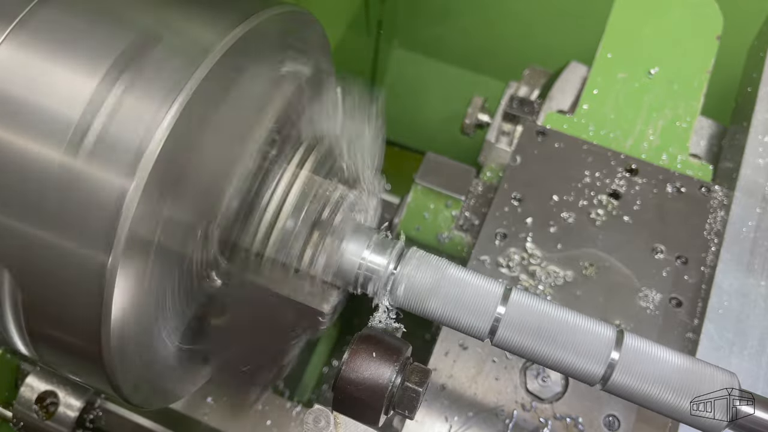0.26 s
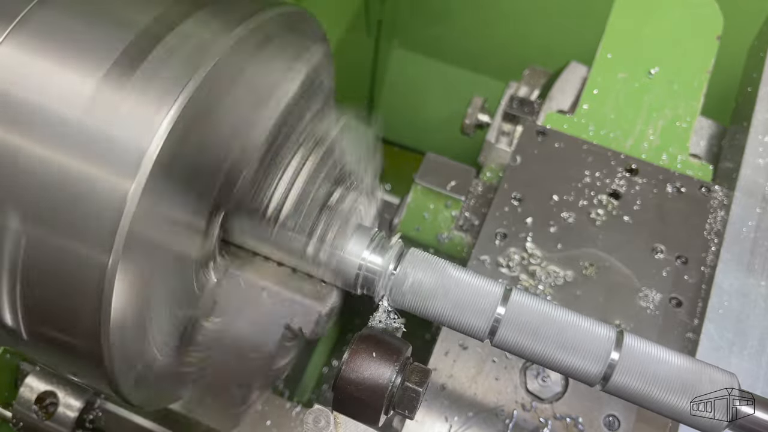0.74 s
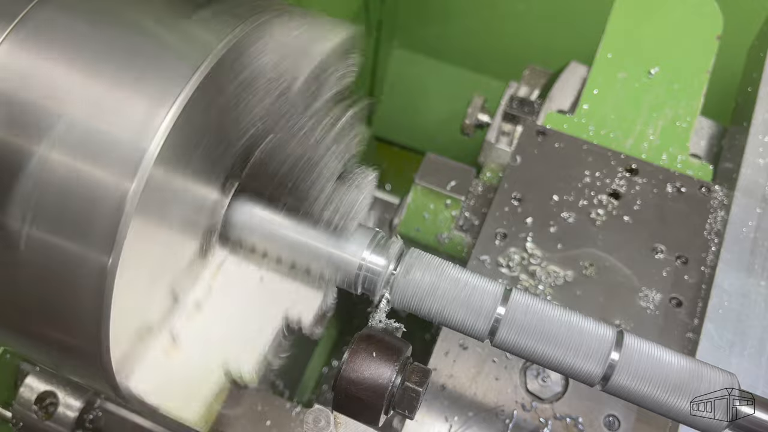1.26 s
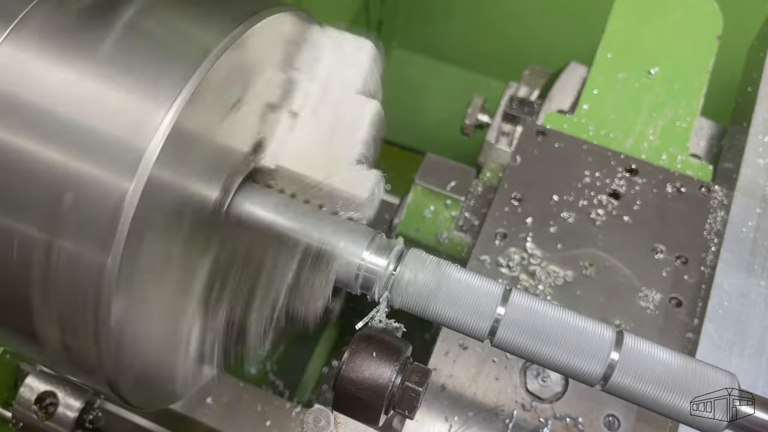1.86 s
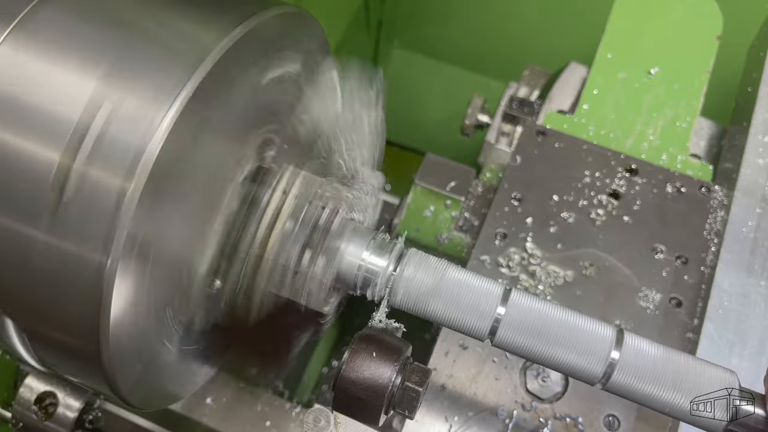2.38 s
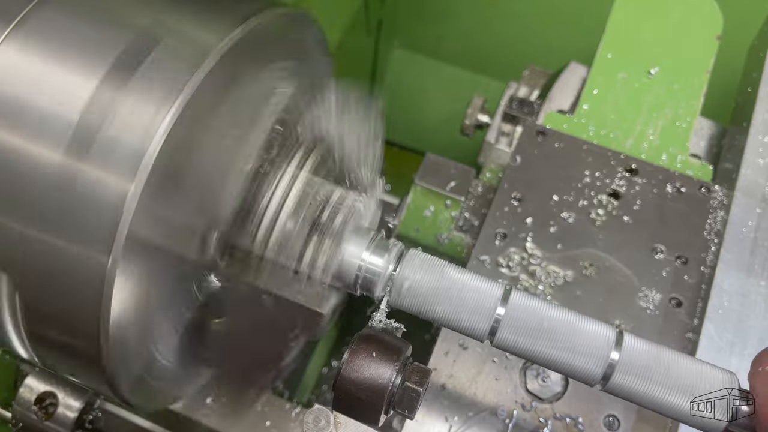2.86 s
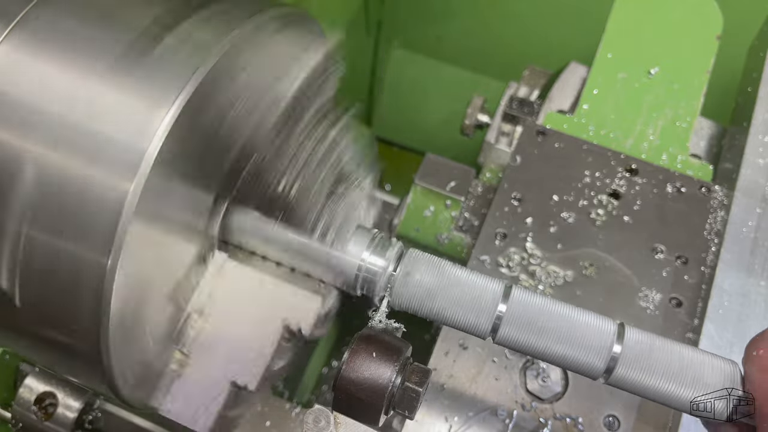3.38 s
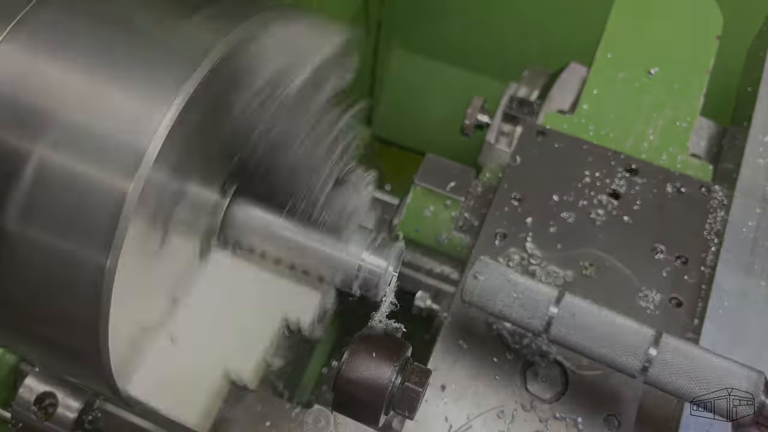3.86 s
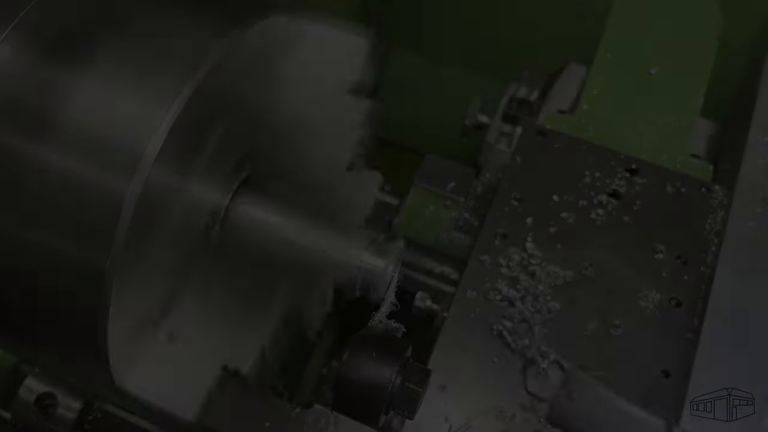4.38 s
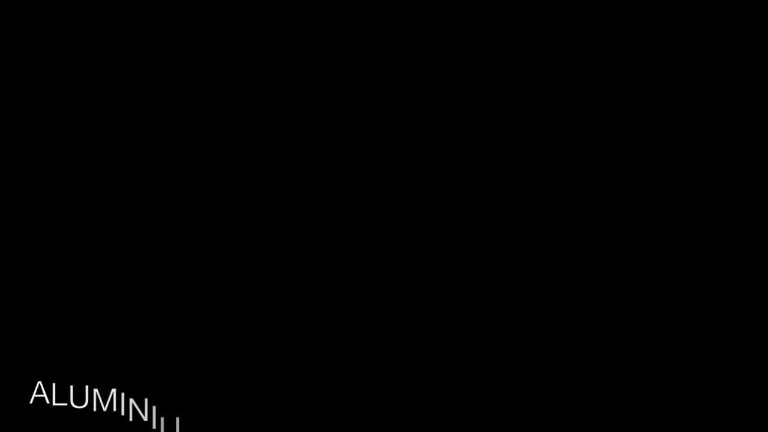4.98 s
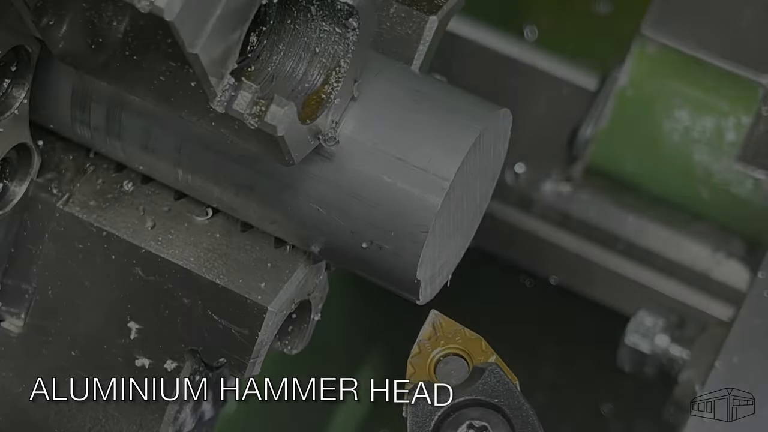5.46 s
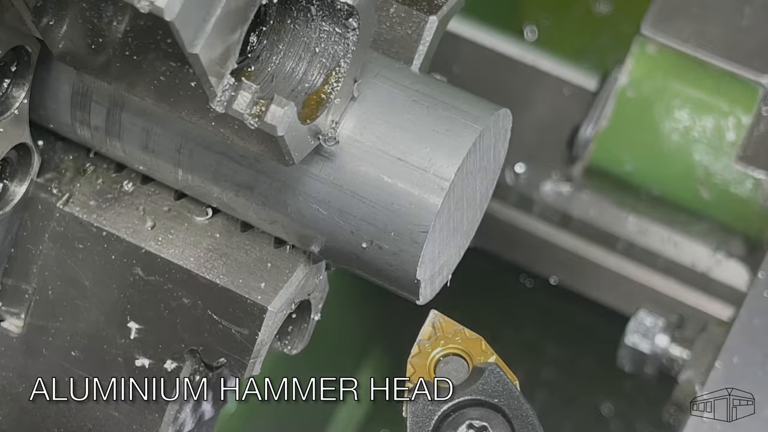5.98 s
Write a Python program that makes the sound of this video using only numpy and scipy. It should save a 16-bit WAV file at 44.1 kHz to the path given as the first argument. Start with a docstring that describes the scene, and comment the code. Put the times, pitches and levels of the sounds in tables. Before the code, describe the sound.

In a workshop, close to a stereo microphone, a geared lathe runs with a steady, buzzing mid-pitched whine and broad casing roar. A parting blade hisses brightly and unevenly, weakens, sings in narrow high bands, then stops past the middle. Low handwheel rumbles come in bursts and small chips tick. Late on, soft thumps mark the cut piece being set down as everything fades.

```python
"""A geared metal lathe runs in a workshop while a hand-fed blade parts off a bar, close to a two-port microphone.
Two gear pairs whine in tooth-mesh tones that throb with their shafts; noise through panel resonances is the casing roar.
The blade hisses in scraped noise and sings in narrow noise bands, weakening unevenly towards the centre of the bar.
The handwheel rumbles in bed, tray and guard, chips tick on the slide, and the cut-off piece is set down in soft thumps.
A low drone of the room swells in late; at the end the whole sound fades down."""
import sys
import numpy as np
from scipy.fft import rfft, irfft, next_fast_len
from scipy.io import wavfile
from scipy.ndimage import map_coordinates

SR = 44100
rng = np.random.default_rng(int(sys.argv[2]) if len(sys.argv) > 2 else 0)


def wrap_up_sound(samples):
    """Save the sound to the file named by the first command line argument, as 16-bit audio."""
    columns = np.atleast_2d(samples).T
    # keep every value between -1 and 1, then stretch to whole-number steps
    tamed = np.clip(columns, -1, 1)
    steps = np.round(tamed * 32767).astype(np.int16)
    wavfile.write(sys.argv[1], SR, steps)


N = 274731
TIME = np.arange(N) / SR  # s

DRIVE_HZ = 423.56  # tooth mesh of the motor gear
LAYSHAFT_HZ, IDLER_HZ, SPINDLE_HZ = 43.08, DRIVE_HZ / 45, 7.2  # shaft turns
GEARED_SPINDLE_HZ = LAYSHAFT_HZ / 6  # spindle turns reckoned through the gears
THROB_S = 0.01473  # first high spot of the layshaft gear

# Force of the cut, heard as hiss; the last row ends the cut: (t/s, hiss level/dB)
CUT = [(0.0, -40), (0.5, -43.5), (1.45, -41), (1.7, -46.5), (2.05, -48), (2.64, -52.5), (2.72, -44.5),
       (2.9, -47), (3.08, -56), (3.29, -49), (3.7, -60)]
CUT_END_S = CUT[-1][0]
# Resonances of the lathe bed: (f/Hz, width/Hz, relative level/dB)
BED = [(111, 70, -11.5), (166, 45, 6.5), (210, 50, 4)]


def amp(db):
    """Decibels to a linear factor."""
    return 10 ** (np.asarray(db) / 20)


def unit(x):
    """x scaled to an rms of 1 over all its samples and channels."""
    return x / np.sqrt(np.mean(x ** 2) + 1e-20)


def along(points, hz):
    """Value at each frequency, from (f/Hz, value) points joined on a log axis."""
    f, v = np.transpose(points)
    return np.interp(np.log(hz + 1), np.log(f + 1), v)


def curve(points):
    """One value per sample, from (t/s, value) points joined by straight lines."""
    return np.interp(TIME, *np.transpose(points))


def wobble(rate):
    """A smooth random curve with rate knots a second."""
    knots = rng.standard_normal(int(N * rate / SR) + 4)
    return map_coordinates(knots, [np.arange(N) * rate / SR])


def filtered(x, response):
    """x filtered by a complex response of frequency."""
    m = next_fast_len(N + 8192)
    hz = np.fft.rfftfreq(m, 1 / SR)
    return irfft(rfft(x, m) * response(hz), m)[..., :N]


def ports(pair, gain):
    """Two unrelated signals become left and right with the likeness, balance and lead of the two ports."""
    # Correlation between the ports: (f/Hz, likeness 0-1)
    alike = [(60, 1), (280, 0.86), (600, 0.6), (900, 0.54), (1250, 0.34), (1900, 0.36), (2300, 0.28),
             (3900, 0.84), (5000, 0.55), (6800, 0.62), (8300, 1), (11000, 0.99), (13000, 0.87)]
    # Level balance of the ports: (f/Hz, left over right/dB)
    lean = [(60, -1.5), (150, -1.5), (500, 1.5), (1200, 0), (1500, 1), (1730, 5.5), (1900, 2), (2600, 4),
            (4600, 4.5), (6000, 3), (8200, 0)]
    # Phase between the ports: (f/Hz, left lead/rad)
    lead = [(100, 0), (2600, 0), (3300, .9), (4600, .2), (5000, .8), (7400, .8), (8700, 0), (9150, -1.2),
            (9800, -2.6), (10000, -np.pi), (10420, -np.pi), (11200, -5), (11800, -2 * np.pi)]

    def mix(hz):
        # the angle between common and opposed parts sets the likeness
        turn = np.arccos(np.clip(along(alike, hz), -1, 1)) / 2
        return gain(hz) * np.array([np.cos(turn), np.sin(turn)])

    def place(hz):
        half = amp(along(lean, hz) / 2) * np.exp(.5j * along(lead, hz))
        return np.array([half, 1 / half])

    mid, side = filtered(pair, mix)
    return filtered(np.array([mid + side, mid - side]), place)


def noise():
    """Two unrelated channels of white noise."""
    return rng.standard_normal((2, N))


def turning(hz, start=0):
    """Cosine of a shaft's angle, highest at the start time in s."""
    return np.cos(2 * np.pi * hz * (TIME - start))


def tone(angle, db, pan_db, lead, waver_db):
    """A tone whose strength wavers; the angle is that of the sum of both ports, complex to swing level too."""
    pair = np.array([[amp(pan_db) * np.exp(1j * lead)], [1]])
    pair = pair / np.linalg.norm(pair) * np.exp(-1j * np.angle(pair.sum()))
    level = 2 * amp(db + waver_db * wobble(7))
    return level * np.real(pair * np.exp(1j * angle))


def repeating(hz):
    """Noise that comes round again hz times a second: the flaws of the same teeth."""
    once = rng.standard_normal((2, 8192))
    where = np.arange(N) * hz / SR % 1 * (SR / hz)  # sample within the turn
    return unit(np.array([map_coordinates(v, [where], order=1) for v in once]))


def ringing(modes):
    """Response of (f/Hz, width/Hz, level/dB) resonances, summed with alternating signs."""
    def response(f):
        return sum((-1) ** k * amp(db) * 1j * f * w / (c * c - f * f + 1j * f * w)
                   for k, (c, w, db) in enumerate(modes))
    return response


def song(hz, width_hz):
    """A narrow, fluttering band of noise round a fixed or moving frequency."""
    slow = filtered(rng.standard_normal((4, N)), lambda f: 1 / (1 + (f / width_hz) ** 2))
    angle = 2 * np.pi * np.cumsum(hz + np.zeros(N)) / SR
    band = slow[:2] * np.cos(angle) + slow[2:] * np.sin(angle)
    return unit(ports(amp(1.4 * wobble(24.03)) * band, np.ones_like))


def layshaft_whine():
    """Mesh multiples of the layshaft gear; their shaft sidebands beat, so the whine throbs once a turn."""
    # Gear tones: (mesh multiple, layshaft multiple, rms level/dB before load, left over right/dB, left lead/rad)
    gear_tones = [(1, 0, -43, -1, 0.1), (2, 0, -41, 14, 2.3), (2, 1, -50, 0, 0.1), (3, -1, -48, -6, -0.7),
                  (3, 0, -39, 3, -1.9), (3, 1, -39, 2, -0.1), (4, -1, -42, -1, -0.0), (4, 0, -38, -2, 0.5),
                  (4, 1, -43, 7, -0.6), (5, -1, -44, 10, -0.5), (5, 0, -39.5, 7, -2.8), (5, 1, -48, 9, 1.4),
                  (6, -1, -55, 21, -1.4), (7, -1, -61, 7, 0.8), (7, 0, -59, 7, -0.4), (8, 0, -58, 11, 0.1)]
    # Strength of the whine before the scalings below: (t/s, load/dB)
    load = [(0, -2), (.25, 0.5), (.6, .5), (1.3, -1), (1.55, 0.5), (1.85, 1), (2.3, 0), (3.0, 0), (3.7, -1),
            (4.3, 1), (4.8, -0.5), (5.5, -0.5), (6.2, 1)]
    # Third layshaft multiple: (t/s, rms level/dB before waver)
    low_tone = [(0, -52), (.45, -52), (.58, -42), (.9, -45.5), (1.3, -46), (1.65, -55), (1.85, -44),
                (2.2, -49), (2.6, -68), (2.9, -45.5), (3.7, -55.5), (6.2, -49)]
    mesh_hz, tooth_s, casing_lag = 348.27, .00018, .8  # Hz; first tooth contact, s; lag of the casing, rad
    smear = .7  # the casing spreads each tooth blow in time, rad per squared multiple
    second_rise = 0.6  # dB/s: the second mesh multiple grows as the load eases
    third_swing = 2.1  # the third mesh multiple follows the load more widely
    load_db = curve(load)
    play = .025 * wobble(30)  # backlash shifts the tooth contact, rad of mesh
    mesh = 2 * np.pi * mesh_hz * (TIME - tooth_s) + play
    shaft = 2 * np.pi * LAYSHAFT_HZ * (TIME - THROB_S)

    # eccentric wheels swing load and contact
    turn = np.exp(2j * np.pi * SPINDLE_HZ * (TIME - .04))  # first high spot of the spindle gear at .04 s
    idler = np.exp(-2j * np.pi * IDLER_HZ * (TIME + .022))
    runout = .19 * turn + .04 / turn - .08 * turn ** 2 + .14 * idler
    gear = 0
    for k, j, db, pan_db, lead in gear_tones:
        angle = k * mesh + j * shaft + smear * k * k - casing_lag
        if k > 2:
            angle = angle - 1j * np.log(1 + runout)  # multiplies the tone by 1 + runout
        if (k, j) == (2, 0):
            db = db + second_rise * (TIME - 3)
        if k == 3:
            db = db + third_swing * load_db
        gear = gear + tone(angle, db, pan_db, lead, waver_db=0.7)
    low = tone(3 * shaft, curve(low_tone), -3.5, -.1, waver_db=1.6)
    return gear * amp(.5 * load_db + .3 * wobble(22)) + low


def motor_whine():
    """Mesh multiples of the motor gear and one multiple of its shaft, each wavering in strength."""
    # Tones: (mesh multiple, motor multiple, rms level/dB before waver, left over right/dB, left lead/rad)
    pinion_tones = [(0, 3, -60, 0, 0), (2, 0, -51, 1, .1), (3, 0, -52, 3, 1.1), (4, 0, -44, 5, .5),
                    (5, 0, -50, 3, .1), (6, 0, -57, 9, -.8), (7, 0, -61, 11, .2), (8, 0, -60, -2, 1.0),
                    (9, 0, -60, 6, .5)]
    lead_s = .000014  # the motor gear's teeth strike this early
    drive = 2 * np.pi * DRIVE_HZ * (TIME + lead_s) + 0.025 * wobble(30)
    motor = 2 * np.pi * 24.56 * TIME  # motor turns at 24.56 Hz
    return sum(tone(k * drive + j * motor, *rest, waver_db=3.0) for k, j, *rest in pinion_tones)


def hums():
    """Further tones of fixed pitch and wavering level, and one deep hum that comes and goes."""
    # Fixed tones: (f/Hz, rms level/dB before waver, left over right/dB, left lead/rad)
    hum_tones = [(100.3, -56, -2, 0), (300, -52, 3, .5), (621, -55, 2, -.4), (681, -53, -4, .2),
                 (796.5, -55, 0, .2), (871.1, -54, -1, .3), (896.7, -49, 3, 1.1), (907.6, -46, 26, -3.0),
                 (921.4, -50, 13, .5), (969.7, -52, -4, .5), (1119.7, -51, 9, -.5), (1117.4, -53, 2, 0),
                 (1134.5, -52, 1, -.1), (1335.7, -50, 18, 2.1), (1684, -49, 1, -.2)]
    # The deep hum: (t/s, rms level/dB before waver)
    deep_level = [(0, -56), (.6, -50), (.95, -66), (1.5, -60), (1.75, -56), (2.5, -52), (2.95, -58),
                  (3.2, -53), (3.65, -46.5), (4.1, -54), (4.4, -66), (4.85, -64), (5.1, -52), (5.4, -57),
                  (6.2, -49)]
    deep = tone(2 * np.pi * 49.1 * TIME, curve(deep_level), 0, 0, waver_db=.7)
    hum = sum(tone(2 * np.pi * hz * TIME + rng.uniform(0, 2 * np.pi), *rest, waver_db=1.5)
              for hz, *rest in hum_tones)
    return deep + hum


def casing():
    """Bearing and tooth noise in the casing panels; its bands above the bass swell with the turning shafts."""
    # Broad colour of the roar: (f/Hz, relative level/dB per Hz)
    roar = [(20, -54), (45, -12.5), (120, -5), (450, -9), (1000, -7), (2000, -6.5), (2400, -13.5),
            (4100, -18.5), (5000, -23), (6400, -26), (7000, -32.5), (11500, -30), (12100, -44),
            (13000, -70)]
    # Panel resonances and dips on that colour: (f/Hz, width/Hz, gain/dB)
    panels = [(270, 64, 4.5), (661, 97, 4.5), (1033, 260, 5.5), (1197, 26, -12), (1227, 100, 7),
              (1294, 30, -1.5), (1382, 77, 8.5), (1477, 29, -8), (1493, 16, 13.5), (1100, 28, 5),
              (1700, 20, 7.5), (1766, 69, 7.5), (1880, 74, 5.5), (1870, 42, -6), (2030, 25, 0),
              (2110, 82, 5.5), (3823, 640, 6.5), (4530, 150, 9.5), (4950, 53, 2), (5240, 90, 8),
              (6250, 350, 3)]
    bumps = rng.standard_normal(SR // 2)  # many small modes make the middle range uneven

    def colour(hz):
        middle = (hz > 400) & (hz < 6000)
        uneven = 1.1 * middle * map_coordinates(bumps, [hz / 35])
        peaks = sum(db / (1 + (2 * (hz - c) / w) ** 2) for c, w, db in panels)
        return amp(along(roar, hz) + uneven + peaks)

    # share of the tooth noise power that returns with each turn
    idler_share, spindle_share = 0.07, 0.1
    drive = (np.sqrt(1 - idler_share - spindle_share) * noise()
             + np.sqrt(idler_share) * repeating(IDLER_HZ)
             + np.sqrt(spindle_share) * repeating(GEARED_SPINDLE_HZ))
    bass, body, bright = (filtered(drive, lambda hz: 1 / (1 + (hz / edge_hz) ** 4))
                          for edge_hz in (800, 2600, 6500))

    # level swings of the three upper bands, in dB inside amp
    throb = turning(LAYSHAFT_HZ, THROB_S)
    idler = turning(IDLER_HZ, 0.078)
    knock = amp(0.5 * throb + 0.15 * idler + .5 * turning(SPINDLE_HZ, 0.005) + 0.7 * wobble(30))
    rattle = amp(2.8 * turning(LAYSHAFT_HZ, 0.012) + 2.1 * idler
                 + 0.48 * turning(5 * IDLER_HZ, 0.018) + 0.55 * wobble(23) + 1.6 * wobble(60))
    fizz = amp(0.37 * throb + 0.32 * idler + 1.2 * wobble(13))
    shaken = (bass + (body - bass) * unit(knock) + (bright - body) * unit(rattle)
              + (drive - bright) * unit(fizz))
    return amp(-31.0) * unit(ports(shaken, colour))


def blade():
    """The chip hisses over the blade in uneven scrapes; blade and holder sing, the blade also near half its pitch."""
    # Colour of the hiss: (f/Hz, relative level/dB per Hz)
    hiss_colour = [(4200, -46), (5500, -12), (8400, -11.5), (9300, 2), (10500, -2.5), (11600, -4.5),
                   (12300, -13), (12700, -10), (13200, -61)]
    # The holder takes over the song: (t/s, level over the hiss/dB before pulsing)
    holder_level = [(0, -17), (.6, -16), (1.45, -14.5), (1.95, -2.5), (2.6, 1), (2.75, 1.5), (3.0, -1),
                    (3.3, -14)]
    # The song pulses three times a spindle turn: (t/s, swing/dB)
    jaw_swing = [(1.5, -2), (1.9, 6), (2.25, 3), (2.5, 3), (3.3, -2)]
    jaw_s = 1.964  # time of one such pulse
    cutting = np.clip((CUT_END_S - TIME) / 0.097, 0, 1)
    scrape = unit(amp(1.6 * wobble(24.3) + 1.4 * wobble(300)))
    hiss = unit(ports(scrape * noise(), lambda f: amp(along(hiss_colour, f))))

    # the blade sings lower as it goes deeper; levels are over the hiss
    blade_hz = 6730 - 170 * TIME + 40 * wobble(7.3)
    flutter = unit(amp(3 * wobble(18)))
    blade_song = amp(-10) * flutter * song(blade_hz, width_hz=93)
    whistle_hz = 3570 - 55 * TIME + 40 * wobble(12)
    whistle = amp(-3.5 - 5 * TIME) * song(whistle_hz, width_hz=48)

    holder_db = curve(holder_level) + curve(jaw_swing) * turning(3 * GEARED_SPINDLE_HZ, jaw_s)
    holder_main = song(6197 + 25 * wobble(9.2), width_hz=62)
    holder_under = amp(-10) * song(5920, width_hz=170)  # a weaker, lower mode
    holder_song = amp(holder_db) * (holder_main + holder_under)
    return cutting * amp(curve(CUT)) * (hiss + blade_song + holder_song + whistle)


def handwheel():
    """Each push on the feed screw shakes bed, tray and guard, each as hard as the grip happens to load it."""
    # Pushes on the handwheel, timed at half rise: (t/s, length/s, bed level/dB, tray level/dB, guard level/dB)
    feed = [(0.146, 0.26, -46, -51, -38), (0.314, 0.29, -37.5, -41, -38.5), (0.502, 0.22, -42, -39, -30),
            (0.71, 0.24, -49, -36, -37.5), (1.003, 0.043, -61, -41, -59), (1.486, 0.075, -50, -47, -41),
            (1.624, 0.092, -39, -45, -35), (1.724, 0.23, -40.5, -44, -38), (1.98, 0.38, -51, -51, -52),
            (2.16, 0.14, -53, -48, -42.5), (2.276, 0.18, -43, -46, -38), (2.467, 0.086, -43, -51, -43),
            (4.046, 0.17, -44, -45, -42), (4.183, 0.11, -40, -41, -44), (4.324, 0.073, -41, -38, -36),
            (4.46, 0.15, -36.5, -41, -42), (4.666, 0.21, -40.5, -42, -50)]
    # Resonances of the tray, then of the guard: (f/Hz, width/Hz, relative level/dB)
    tray = [(253.9, 8.8, 0.5), (400, 11, -6.5)]
    guard = [(293, 5.3, 3), (314, 19, -3), (442, 41, -14), (485, 65, -7), (1080, 200, -11.5)]
    # The slow feed until the cut ends, in bed, tray, guard: (level/dB)
    creep_levels = [-60, -51, -76]
    # The held notes of bed, tray, guard: (f/Hz)
    held_notes = [158.7, 260.7, 291.3]
    grip_s, let_go_s, lumps_db = 0.04, 0.14, -0.3  # rise, fall, unevenness
    held = .57  # power share that rings as a held note
    start, length, *loads_db = np.transpose(feed)[..., None]
    rise = np.clip((TIME - start) / grip_s + .5, 0, 1)
    fall = np.clip((start + length - TIME) / let_go_s + .5, 0, 1)
    push = rise * fall

    rumble = 0
    for db, creep_db, hz, modes in zip(loads_db, creep_levels, held_notes, (BED, tray, guard)):
        level = (amp(db) * push).max(axis=0) + amp(creep_db) * (TIME < CUT_END_S)
        rough = np.sqrt(1 - held) * unit(ports(noise(), ringing(modes)))
        note = np.sqrt(2 * held) * np.sin(2 * np.pi * hz * TIME + 0.75 * wobble(6))
        rumble = rumble + level * unit(amp(lumps_db * wobble(21)) * (rough + note))
    return rumble


def chips():
    """Chips land on the slide: each is noise with a sharp tick and a short bright tail."""
    # Landing chips: (t/s, strength/dB before the colour)
    landings = [(0.3092, -38), (0.4539, -35), (0.4923, -35), (0.5115, -30), (0.852, -37), (1.2057, -36),
                (1.5318, -35.5), (1.713, -39), (1.915, -35), (2.0255, -38), (2.0459, -26), (2.4384, -29),
                (3.5150, -35), (3.5172, -36), (4.0487, -35.5), (4.1066, -36), (4.1568, -38), (4.4927, -35),
                (4.7545, -38), (4.7782, -25)]
    # Colour of a tick: (f/Hz, gain/dB)
    tick_colour = [(3000, -38.5), (6500, -1), (8000, -11), (9500, 7), (11500, 1.5), (13400, -28)]
    t = np.arange(SR // 20) / SR
    shape = amp(-60 * t / 0.011) + 0.23 * amp(-60 * t / 0.07)  # 60 dB down in 11 ms and 70 ms
    # fine swarf ticks faintly all the time: random times, strengths from -53 to -44 dB
    strays = rng.uniform(size=(90, 2)) * [N / SR, 9] - [0, 53]
    ticks = np.zeros((2, N + SR))
    for s, db in [*landings, *strays]:
        first = round(s * SR)
        ticks[:, first:first + len(t)] += amp(db) * shape * rng.standard_normal((2, len(t)))
    return ports(ticks[:, :N], lambda hz: amp(along(tick_colour, hz)))


def drone():
    """A faint low drone of the room, coloured noise, swells in late."""
    # Colour of the drone: (f/Hz, relative level/dB per Hz)
    drone_colour = [(30, -21.5), (48, 2), (80, 3), (110, -13), (200, -43)]
    start_s, rise_s = 4.46, 0.82
    rise = np.clip((TIME - start_s) / rise_s, 0, 1)
    return amp(-48.5) * rise * unit(ports(noise(), lambda hz: amp(along(drone_colour, hz))))


def thumps():
    """The cut-off piece is set down: soft blows ring the bed's modes above its lowest."""
    # Blows: (t/s, peak level/dB)
    blow_levels = [(4.474, -34), (4.521, -26), (4.698, -28), (4.785, -25.5)]
    push = np.pad(np.hanning(150), (0, N - 150))
    ring = filtered(push, ringing(BED[1:]))[:SR // 4]
    blows = np.zeros(N + SR)
    for s, db in blow_levels:
        first = round(s * SR)
        blows[first:first + len(ring)] += amp(db) * ring / ring.max()
    return blows[:N]


def scene():
    """All sources of the workshop together, left and right."""
    machine = layshaft_whine() + motor_whine() + hums() + casing()
    return machine + blade() + handwheel() + chips() + drone() + thumps()


def record(dry):
    """The level fades down along a quarter cosine, not quite to silence; nothing passes above the band limit."""
    fade_start_s, fade_end_s, top_hz = 4.28, 6.388, 13400  # the sound stops before the fade is complete
    gone = np.clip((TIME - fade_start_s) / (fade_end_s - fade_start_s), 0, 1)
    return filtered(dry * np.cos(np.pi / 2 * gone), lambda hz: hz < top_hz)


dry = scene()
out = record(dry)
wrap_up_sound(out)
```